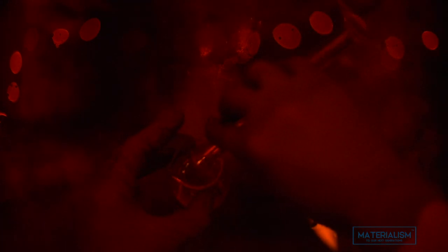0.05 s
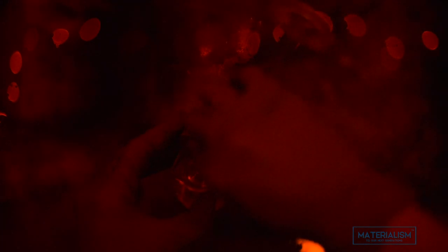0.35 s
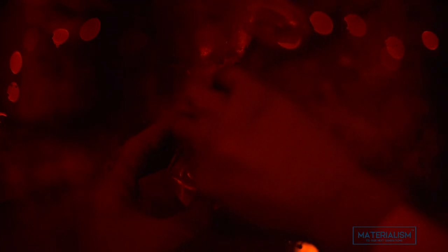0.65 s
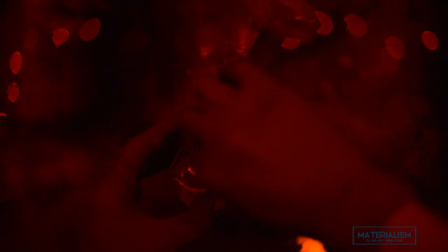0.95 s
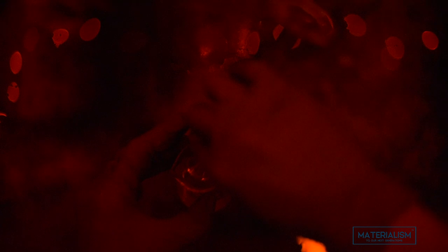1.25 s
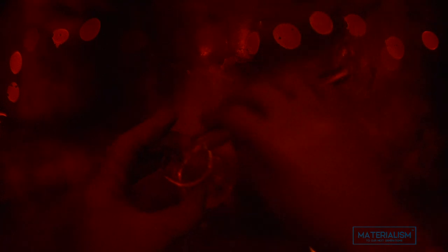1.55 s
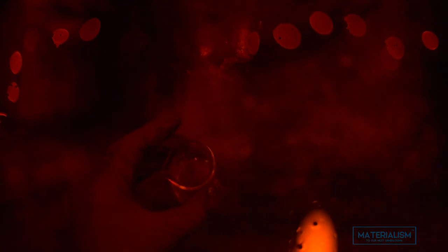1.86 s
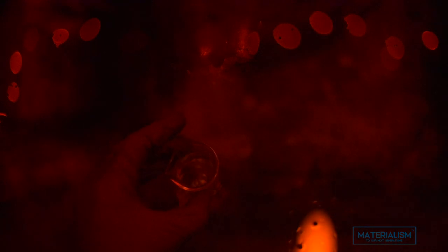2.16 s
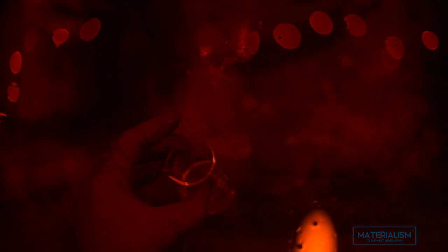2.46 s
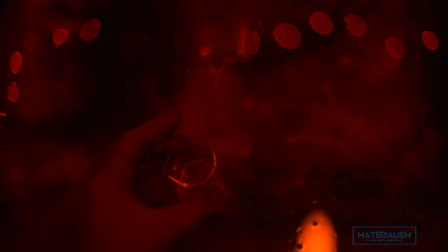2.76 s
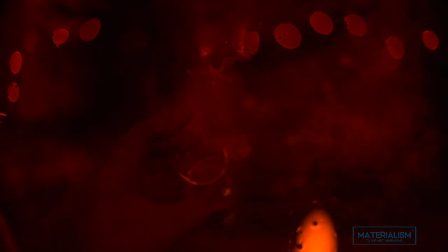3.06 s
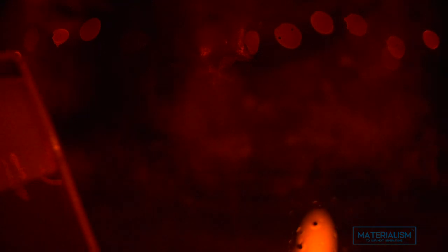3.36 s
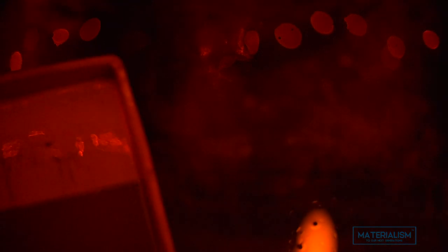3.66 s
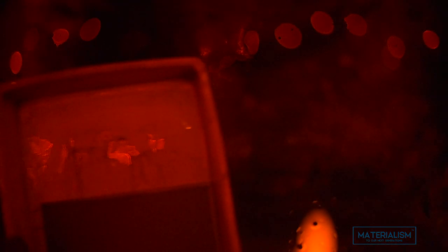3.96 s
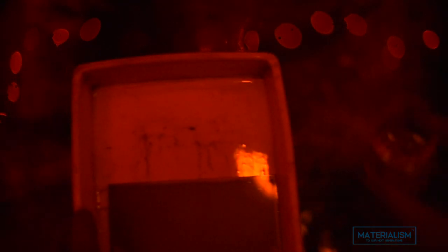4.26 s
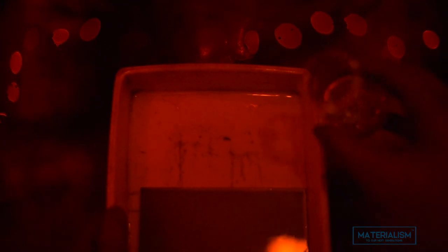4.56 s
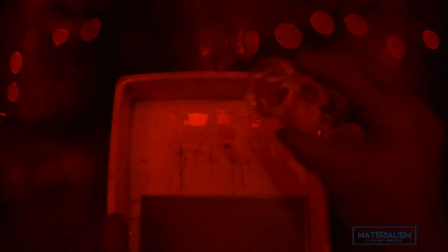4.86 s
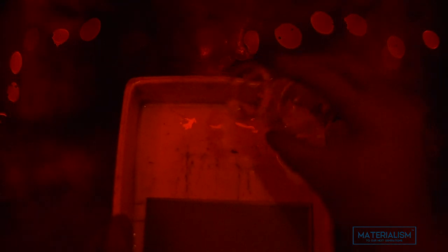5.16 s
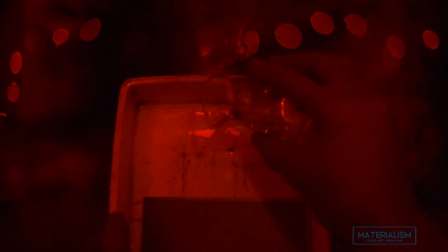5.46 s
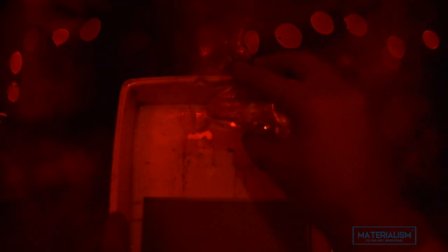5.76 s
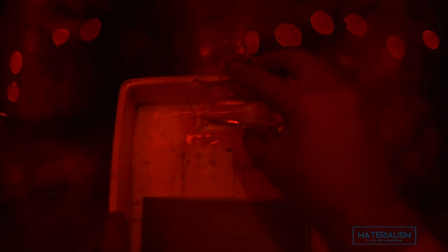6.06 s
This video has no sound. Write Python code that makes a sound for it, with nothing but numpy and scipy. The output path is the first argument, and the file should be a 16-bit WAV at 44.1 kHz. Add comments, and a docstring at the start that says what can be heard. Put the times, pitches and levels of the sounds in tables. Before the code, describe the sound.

A glass dropper clinks on a small bottle, drops plink, a plastic tray ticks along, then a beaker rings with three knocks.

```python
"""Close work at a darkroom bench in a small, quiet room, over hiss, ventilation drone and low rumble.
A glass dropper clinks on a small bottle, sleeves rustle, drops plink and tiny bubbles burst.
The dropper is laid aside, a few more drops fall, and the bottle is set down with a thud.
A hand brushes the bench, a beaker sings as it slides, and a plastic tray ticks and drags along.
Last, the beaker knocks three times and its glass rings."""
import sys
import numpy as np
from scipy import signal
from scipy.fft import rfft, irfft
from scipy.io import wavfile
from scipy.ndimage import uniform_filter1d

SR = 44100
rng = np.random.default_rng(int(sys.argv[2]) if len(sys.argv) > 2 else 0)


def file_out(sig):
    """Save sig as 16-bit WAV at sys.argv[1]."""
    # one column per channel
    cols = np.atleast_2d(sig).T
    # limit, then scale
    lim = np.clip(cols, -1, 1)
    pcm = np.round(lim * 32767).astype(np.int16)
    wavfile.write(sys.argv[1], SR, pcm)


N = 278532


def amp(db):
    """Decibels to gain."""
    return 10 ** (np.asarray(db) / 20)


def unit_rms(x):
    """Scales to rms 1."""
    return x / np.sqrt(np.mean(x ** 2) + 1e-20)


def seconds(size=16384):
    """Time axis, by default of one hit."""
    return np.arange(size) / SR


def curve(points, hz):
    """Reads (freq_hz, value) points on a log-frequency axis."""
    freqs, values = np.transpose(points)
    return np.interp(np.log(hz + 1), np.log(freqs + 1), values)


def fader(points):
    """Gain that follows (time_s, level_db) points, silent outside their span."""
    times, db = np.transpose(points)
    return amp(np.interp(seconds(N), times, db, left=-200, right=-200))


def gesture(start_s, length_s, attack_s, release_s):
    """Gain of one movement: it gathers speed, holds and dies away."""
    t = seconds(N) - start_s
    return np.clip(t / attack_s, 0, 1) * np.exp(-np.maximum(t - length_s, 0) / release_s)


def add(mix, start_s, sound):
    """Mixes a sound in at its start time."""
    part = mix[..., round(start_s * SR):][..., :sound.shape[-1]]
    part += sound[..., :part.shape[-1]]


def colour(x, gain):
    """Filters by a function of frequency."""
    return irfft(rfft(x) * gain(np.fft.rfftfreq(x.shape[-1], 1 / SR)), x.shape[-1])


# How alike left and right are: freq_hz, correlation
STEREO_LIKENESS = [(60, 0.98), (150, 0.36), (380, 0.55), (950, 0.25), (2380, 0.038), (5980, 0.016),
                   (15000, 0.12)]
def noise(spectrum):
    """Stereo noise of rms 1, shaped by (freq_hz, level_db) points, narrowest in the bass."""
    a, b = rng.standard_normal((2, N))
    mid = colour(a, lambda hz: np.sqrt(1 + curve(STEREO_LIKENESS, hz)))
    side = colour(b, lambda hz: np.sqrt(1 - curve(STEREO_LIKENESS, hz)))
    return unit_rms(colour(np.array([mid + side, mid - side]), lambda hz: amp(curve(spectrum, hz))))


def burst(shape_db, t60_s):
    """A puff of coloured noise that dies at once."""
    t = seconds()
    puff = colour(rng.standard_normal(len(t)), lambda hz: amp(shape_db(hz)))
    return unit_rms(puff) * amp(-60 * t / t60_s)


def ring(modes, tilt_db=np.zeros_like, spread_hz=5000):
    """Dying modes; higher ones reach the two ears further out of step."""
    hz, db, t60_s = np.transpose(modes)[..., None]
    t = seconds()
    skew = np.minimum(hz / spread_hz, 1) * rng.choice([-1, 1], hz.shape) * 0.8
    decays = amp(db + tilt_db(hz) - 60 * t / t60_s)
    return np.array([(decays * np.sin(2 * np.pi * hz * t + side * skew)).sum(0) for side in (-1, 1)])


def strike_glass(blow, modes, crack_eq, crack_t60_s):
    """A blow rings the glass over a short crack; the point of contact favours one narrow band."""
    db, mid_db, top_db, contact_ms, favoured_hz, favour_db, crack_db = blow
    tilt_db = lambda hz: curve([(1600, 0), (3800, mid_db), (5600, mid_db), (8500, top_db)], hz)
    point_db = lambda hz: tilt_db(hz) + favour_db * np.exp(-((hz / favoured_hz - 1) / 0.02) ** 2)
    tone = ring(modes, point_db)
    crack = amp(crack_db) * burst(lambda hz: curve(crack_eq, hz) + tilt_db(hz), crack_t60_s)
    attack = 1 - np.exp(-seconds() * 1000 / contact_ms)
    return amp(db) * (tone + crack) * attack


# Colour of the room's hiss: freq_hz, level_db
AIR_EQ = [(12, -29.5), (20, -1.5), (81, -1), (158, -3.5), (419, -10.5), (570, -11.5), (891, -12),
          (996, -15), (1210, -14), (1950, -16), (5470, -20), (8790, -14.5), (11600, -23), (12600, -22),
          (15800, -31)]
# Colour of its low rumble: freq_hz, level_db
RUMBLE_EQ = [(70, -35), (120, -21), (175, -18.5), (210, -10), (250, -10), (300, 2.5), (360, -10),
             (480, -9.5), (800, -27.5)]
def room_tone():
    """Steady hiss, a ventilation drone that grows and wavers, and a rumble that swells as it fades."""
    t = seconds(N)
    growth_s, waver_s, swell_period_s, first_swell_s = 1.2, 0.75, 1.258, 0.18
    waver = unit_rms(colour(rng.standard_normal(N), lambda hz: hz * np.exp(-(hz * waver_s) ** 2)))
    drone_db = -66.5 - 19 * np.exp(-t / growth_s) + 3.8 * waver
    drone = amp(drone_db) * noise([(35, -6), (60, -4), (72, 7), (86, 7), (110, -6), (200, -39)])
    swell = np.cos(2 * np.pi * (t - first_swell_s) / swell_period_s)
    rumble_db = -67 - 0.52 * t + 4.5 * swell
    return amp(-60.5) * noise(AIR_EQ) + drone + amp(rumble_db) * noise(RUMBLE_EQ)


# Dropper taps: start_s, level_db, mid_db, top_db, contact_ms, favoured_hz, favour_db, crack_db
DROPPER_TAPS = [(0.0004, -29, -2.5, -16, 2.3, 7930, 19, -6),
                (0.2877, -31, -0.5, -3.5, 0.73, 9540, 19, -1.5), (0.9488, -54, -3, -3, 0.54, 2110, 13, 3.5),
                (0.9782, -37, -2.5, -9.5, 2.1, 8800, 14, -2), (0.9819, -21, -22.5, -25, 2.7, 5350, 20, -48),
                (1.1447, -22.5, -5.5, -14.5, 1.65, 4025, 9, -12.5)]
# The bottle's ring: pitch_hz, level_db, t60_s
BOTTLE_MODES = [(1273, -3, 0.05), (1246, -18.5, 0.079), (1960, -13, 0.013), (2105, -7.5, 0.034),
                (3180, -10, 0.018), (3360, -2, 0.015), (3998, -4.5, 0.041), (4095, -4, 0.03),
                (5444, 3.5, 0.012), (6370, -8, 0.026), (7900, -11, 0.054), (8880, -4, 0.024),
                (9600, -2, 0.013), (10970, 7, 0.015), (11140, 2, 0.033), (12800, -7, 0.027)]
def dropper_clinks():
    """The dropper taps the neck of the hand-damped bottle, whose two lowest modes sink as it fills."""
    sag_per_s, in_tune_s = 0.054, 0.92
    crack_eq = [(400, -28), (950, -22), (1300, 3), (2000, 3.5), (2700, 0), (4000, 3.5), (6800, -4),
                (11000, 10), (13000, -1), (15500, -19)]
    out = np.zeros((2, N))
    for start_s, *blow in DROPPER_TAPS:
        tuning = 1 + sag_per_s * (in_tune_s - start_s)
        low_modes = [(hz * tuning, db, t60_s) for hz, db, t60_s in BOTTLE_MODES[:2]]
        add(out, start_s, strike_glass(blow, low_modes + BOTTLE_MODES[2:], crack_eq, crack_t60_s=0.041))
    return amp(-1) * out


# Arm movements: start_s, length_s, level_db
ARM_MOVES = [(0.101, 0.29, -67), (1.383, 0.36, -65), (1.547, 0.092, -62), (1.784, 0.44, -66.5),
             (2.285, 0.33, -72.5), (2.902, 0.016, -68.5), (3.075, 0.06, -62.5), (3.341, 0.13, -61.5),
             (3.62, 0.63, -70.5), (3.982, 0.33, -64), (4.367, 0.07, -66), (4.576, 0.027, -64.5),
             (4.65, 0.17, -79), (5.146, 0.34, -82)]
# Colour of the cloth: freq_hz, level_db
CLOTH_EQ = [(300, -10.5), (800, -4), (1500, -5.5), (3200, -3), (5400, -1.5), (8800, 3), (10500, -0.5),
            (13500, -9), (15800, -18)]
def sleeves():
    """Cloth hisses in small clumps as the arms move."""
    clumps = amp(1.3 * unit_rms(uniform_filter1d(rng.standard_normal(N), size=300)))
    power = sum((amp(db) * gesture(start_s, length_s, attack_s=0.027, release_s=0.048)) ** 2
                for start_s, length_s, db in ARM_MOVES)
    return amp(8.5) * np.sqrt(power) * clumps * noise(CLOTH_EQ)


# Tiny pops in the liquid: start_s, level_db, pitch_hz, spray_gain
BUBBLE_POPS = [(0.4220, -36, 11100, 0.75), (0.427, -44, 5070, 0.43), (0.441, -45, 8100, 1.1),
               (0.48, -39.5, 10200, 0.97), (0.5387, -42.5, 3370, 0.39), (0.540, -50.5, 5300, 2.3),
               (0.642, -50, 9900, 0.86), (0.6661, -44, 9280, 1.06), (0.8825, -52, 7500, 1.17),
               (2.2117, -35, 10940, 0.15)]
def bubble_pops():
    """A tiny bubble bursts: a high ping inside a puff of spray."""
    out = np.zeros((2, N))
    for start_s, db, pitch_hz, spray_gain in BUBBLE_POPS:
        ping = ring([(pitch_hz, -2, 0.025)])
        band_db = lambda hz: -10 * np.log10(1 + (np.log2((hz + 1) / pitch_hz) / 0.5) ** 4)  # octave wide
        spray = burst(lambda hz: band_db(hz) + curve([(11000, 6), (15500, -12)], hz), t60_s=0.019)
        add(out, start_s, amp(db) * (ping + spray_gain * spray))
    return out


# Plinks of falling drops: start_s, level_db, start_hz, end_hz, t60_s
PLINKS = [(0.4238, -22, 1098, 1174, 0.037), (.4245, -33, 715, 915, 0.031), (.540, -46.5, 1150, 1106, 0.046),
          (2.104, -36, 1365, 1706, 0.044), (2.243, -31.5, 1360, 2010, 0.014),
          (2.253, -37.5, 1830, 1820, 0.032)]
def drops():
    """Each drop traps a ringing bubble; most climb in pitch as they near the surface."""
    out, t = np.zeros(N), seconds()
    glide_s = 0.0042
    for start_s, db, start_hz, end_hz, t60_s in PLINKS:
        hz = end_hz + (start_hz - end_hz) * np.exp(-t / glide_s)
        attack = 1 - np.exp(-(t * start_hz) ** 2)
        add(out, start_s, amp(db - 60 * t / t60_s) * attack * np.sin(2 * np.pi * np.cumsum(hz) / SR))
    return out


# Colour of the dropper meeting the bench: freq_hz, level_db
DROPPER_DOWN_EQ = [(600, -7), (1500, -4), (4400, -2.5), (7000, -2.5), (11400, -2), (15500, -11)]
def dropper_down():
    """One dry tick as the dropper is laid aside."""
    out = np.zeros((2, N))
    add(out, 1.808, amp(-45) * burst(lambda hz: curve(DROPPER_DOWN_EQ, hz), t60_s=0.068))
    return out


# Colour of the bottle meeting the bench: freq_hz, level_db
BOTTLE_DOWN_EQ = [(290, -40), (500, -19), (716, -4), (792, -8), (1750, -19), (1990, -4), (3740, 0.5),
                  (5130, -3.5), (6830, -0.5), (12700, -11), (15500, -27)]
# The bench's thud: pitch_hz, level_db, t60_s
BENCH_MODES = [(128, 1, 0.083), (164, 6.5, 0.061), (213, 8.5, 0.052), (279, 2, 0.072), (348, -5, 0.054)]
def bottle_down():
    """The bottle's edge touches, then its base lands and the bench thuds."""
    out = np.zeros((2, N))
    for start_s, db, t60_s in [(2.7795, -41, 0.036), (2.791, -40.5, 0.043)]:
        add(out, start_s, amp(db) * burst(lambda hz: curve(BOTTLE_DOWN_EQ, hz), t60_s))
    attack = 1 - np.exp(-seconds() / 0.0043)
    add(out, 2.792, amp(-39.5) * ring(BENCH_MODES) * attack)
    return out


def hand_brush():
    """A hand brushes the bench with a short, bright swish."""
    stroke = fader([(3.0, -62), (3.08, -48.5), (3.12, -52), (3.15, -65)])
    return stroke * noise([(1500, -20), (2200, -1.5), (4500, -8), (9000, -2), (15000, -18)])


# The beaker's ring, slid or knocked: pitch_hz, level_db, t60_s
BEAKER_MODES = [(656, -32, 0.14), (913, -35, 0.054), (1254, -23.5, 0.11), (1363, -14, 0.046),
                (1530, -18, 0.24), (1548, -7.5, 0.15), (1634, -21, 0.24), (2323, -20, 0.092),
                (2450, -30.5, 0.24), (2482, -16.5, .14), (2525, -8.5, 0.13), (2665, -4.5, 0.055),
                (3457, -26, 0.12), (3634, -27, 0.15), (3744, -12, .05), (4033, -6.5, 0.054),
                (4100, -30, 0.1), (5470, -25, 0.11), (5685, -19.5, 0.08), (6430, -26, 0.19),
                (7470, -19.5, 0.087), (7820, -19.5, 0.05), (8580, -31, 0.092), (9400, -33, 0.17),
                (9890, -32, 0.18), (11600, -39, 0.11)]
# Colour of the grit under its base: freq_hz, level_db
GRIT_EQ = [(150, -46), (300, 22.5), (480, -5), (1100, 3), (3500, 9.5), (5000, 0), (9500, 9), (11000, -9),
           (14000, -24)]
def beaker_slide():
    """Fine slips of the base keep the hand-damped beaker singing, pressed harder as it goes."""
    start_s, length_s, attack_s = 3.125, 0.17, 0.011
    slips_per_s, damping_db_per_s, push_db_per_s = 2500, 400, 38.5
    song_eq = [(1500, -1.5), (2600, -3.5), (3480, 23), (3700, 0), (4000, -7), (5600, 17), (6400, 22.5),
               (7400, 12.5), (10000, 23.5), (11300, 6)]
    slips = rng.standard_normal(N) * (rng.random(N) < slips_per_s / SR)
    glass = ring(BEAKER_MODES, lambda hz: curve(song_eq, hz)) * amp(-damping_db_per_s * seconds())
    song = unit_rms(signal.fftconvolve(slips[None], glass, axes=1)[:, :N])
    singing = amp(1.5) * gesture(start_s, length_s, attack_s, release_s=0.048) * song
    scraping = amp(-1) * gesture(start_s, length_s, attack_s, release_s=0.011) * noise(GRIT_EQ)
    pressure = amp(-54.5 + push_db_per_s * np.clip(seconds(N) - start_s, 0, length_s))
    return pressure * (singing + scraping)


# Ticks of the moving tray: start_s, level_db, snap_db
TRAY_HITS = [(3.429, -44, -1), (3.5783, -48, -5), (3.6765, -40.5, -4.5), (3.752, -43, -7.5),
             (3.9084, -44.5, -5), (4.099, -42, -2), (4.3374, -45, 2), (4.4393, -48.5, -6),
             (4.7444, -49.5, -5), (5.067, -46.5, -8), (5.1427, -48.5, -9), (5.363, -58.5, 3)]
# The plastic's short ring: pitch_hz, level_db, t60_s
TRAY_MODES = [(3590, -6, 0.014), (3540, -6, 0.0086), (5900, -7, 0.014), (8600, -4.5, 0.01)]
def tray_ticks():
    """The plastic tray ticks as it is pushed along, rocking back with a softer rebound each time."""
    rebound_s, rebound_db = 0.014, -10
    snap_eq = [(1500, -15), (3500, 7.5), (9000, 6), (15000, -7)]
    attack = 1 - np.exp(-seconds() / 0.00065)
    out = np.zeros((2, N))
    for start_s, db, snap_db in TRAY_HITS:
        for delay_s, softer_db in [(0, 0), (rebound_s, rebound_db)]:
            snap = amp(snap_db - 2.5) * burst(lambda hz: curve(snap_eq, hz), t60_s=0.02)
            body = amp(3) * attack * ring(TRAY_MODES)
            add(out, start_s + delay_s, amp(db + softer_db) * (body + snap))
    return out


# Rise and fall of the tray's drag: time_s, level_db
DRAG_LEVELS = [(4.15, -85), (4.28, -62), (4.4, -70), (4.54, -63.5), (4.65, -69)]
def tray_drag():
    """The tray rubs on the bench: a faint, narrow band of friction noise."""
    return fader(DRAG_LEVELS) * noise([(500, -20), (850, -19), (950, -7), (1060, -28), (2000, -30)])


# Beaker knocks: start_s, level_db, mid_db, top_db, contact_ms, favoured_hz, favour_db, crack_db
BEAKER_BLOWS = [(5.8392, -14.5, -0.28, 1.3, 1.0, 1557, 1.9, -16),
                (5.9345, -20.5, 0.63, 1.3, 1, 2740, 1.9, -16),
                (6.039, -19.5, -0.73, .5, 1.0, 2473, 7.9, -12.5)]
def beaker_knocks():
    """Three quick knocks set the beaker's glass ringing."""
    crack_eq = [(250, -14.5), (480, -8), (700, -1), (1000, -1.5), (1400, 6), (1950, 1.5), (2600, 2),
                (3100, -15), (4000, -5), (5000, -7), (8000, -9), (14000, -38)]
    out = np.zeros((2, N))
    for start_s, *blow in BEAKER_BLOWS:
        add(out, start_s, strike_glass(blow, BEAKER_MODES, crack_eq, crack_t60_s=0.06))
    return out


# Early reflections off bench and walls: left_delay_ms, right_delay_ms, gain
REFLECTIONS = [(2.15, 2.0, 0.024), (3.916, 9.1, 0.047), (6.355, 5.4, 0.44), (9.44, 9.2, 0.46),
               (11.53, 13, 0.27), (32, 11, 0.22)]
# Length of the room's tail: freq_hz, t60_s
ROOM_DECAY = [(150, 0.33), (1200, 0.2), (4000, 0.23), (11000, 0.16)]
def room(x, tail_db):
    """The direct sound, a few near reflections and a short diffuse tail in each ear."""
    t = seconds()
    build_up = np.clip((t - 0.006) / 0.012, 0, 1)
    taps = rng.choice([-1., 1.], (2, len(t))) * (rng.random((2, len(t))) < 0.15) * build_up
    hz, frame_s, bands = signal.stft(taps + 0.22 * taps[::-1], SR, nperseg=256)  # a little crossfeed
    decay = amp(-60 * frame_s / curve(ROOM_DECAY, hz)[:, None])
    tail = signal.istft(bands * decay, SR, nperseg=256)[1]
    response = amp(tail_db) * tail / np.linalg.norm(tail[0])
    response[:, 0] += 1
    for left_ms, right_ms, gain in REFLECTIONS:
        response[0, round(left_ms * SR / 1000)] += gain
        response[1, round(right_ms * SR / 1000)] += gain
    return signal.fftconvolve(x, response, axes=1)[:, :N]


def scene():
    """Bottle and liquid sit further back, tray and beaker nearer; the friction sounds stay dry."""
    far = dropper_clinks() + bubble_pops() + drops() + dropper_down() + bottle_down()
    near = tray_ticks() + beaker_knocks()
    friction = sleeves() + hand_brush() + beaker_slide() + tray_drag()
    return room_tone() + room(far, tail_db=-4) + room(near, tail_db=-9) + friction


def record(dry):
    """A steep low-pass trims the very top of the treble."""
    cutoff_hz = 15900
    lowpass = signal.firwin(511, cutoff_hz, window=("kaiser", 9), fs=SR)
    return signal.oaconvolve(dry, lowpass[None], "same")


dry = scene()
out = record(dry)
file_out(out)
```